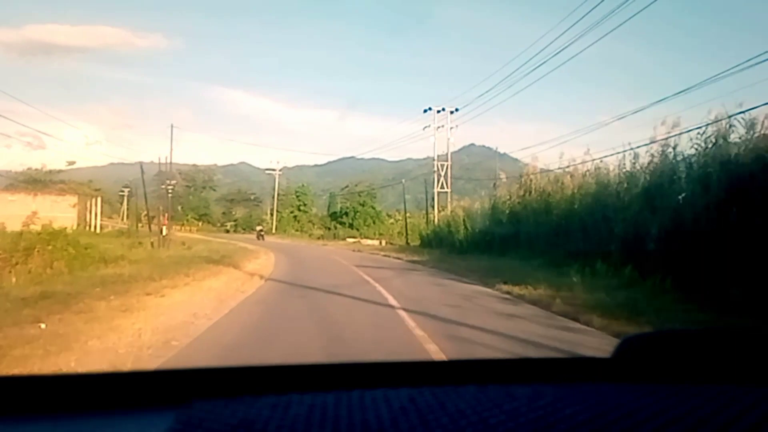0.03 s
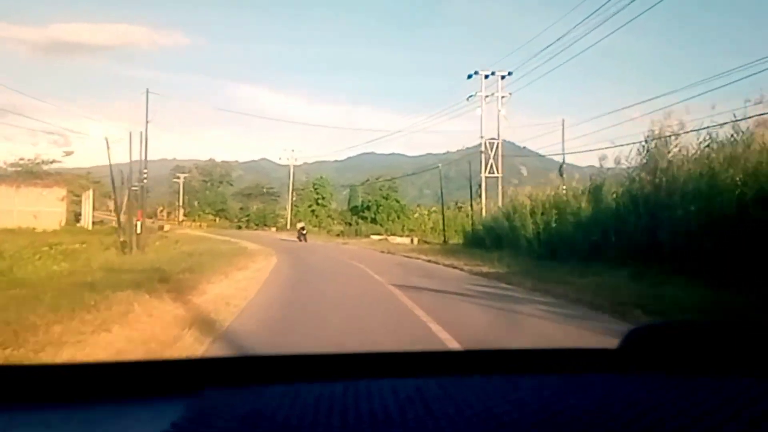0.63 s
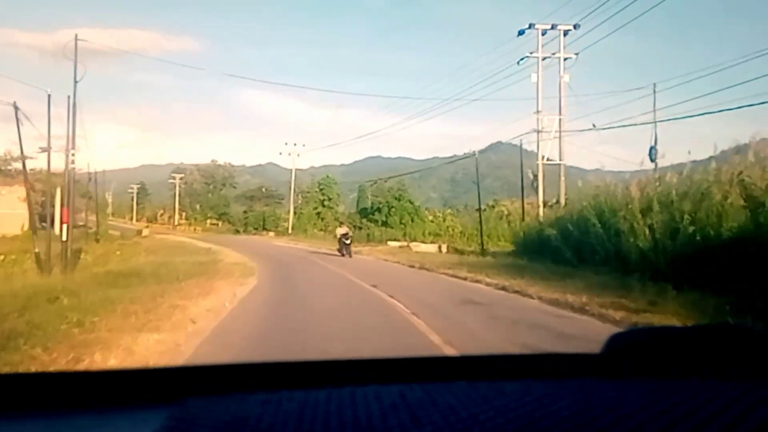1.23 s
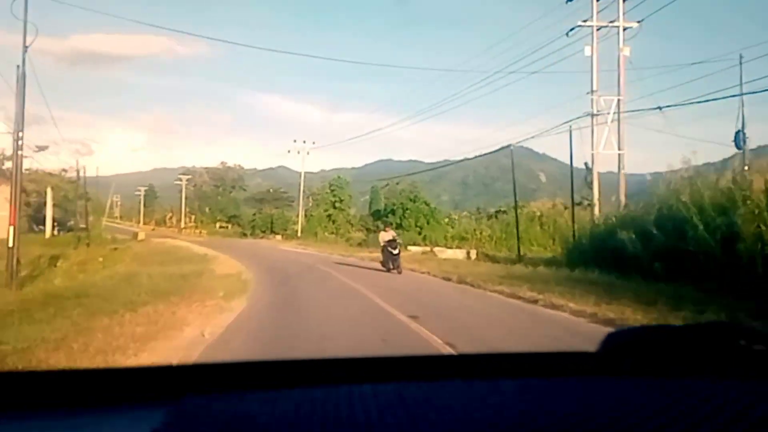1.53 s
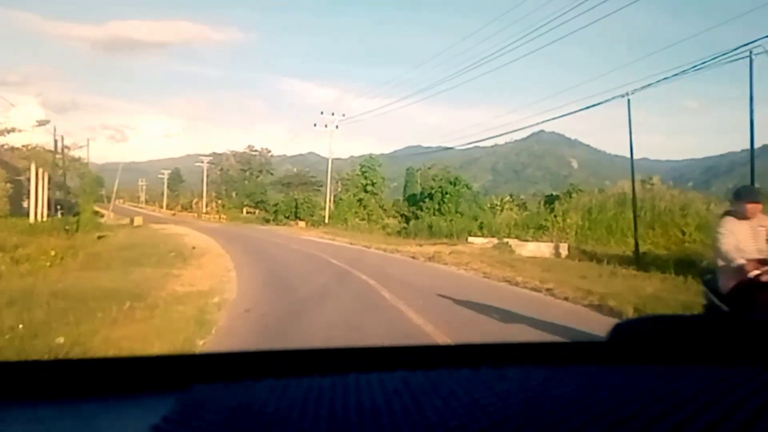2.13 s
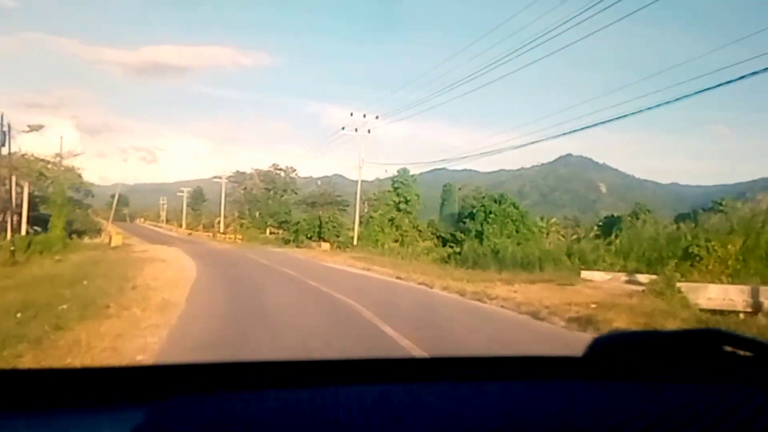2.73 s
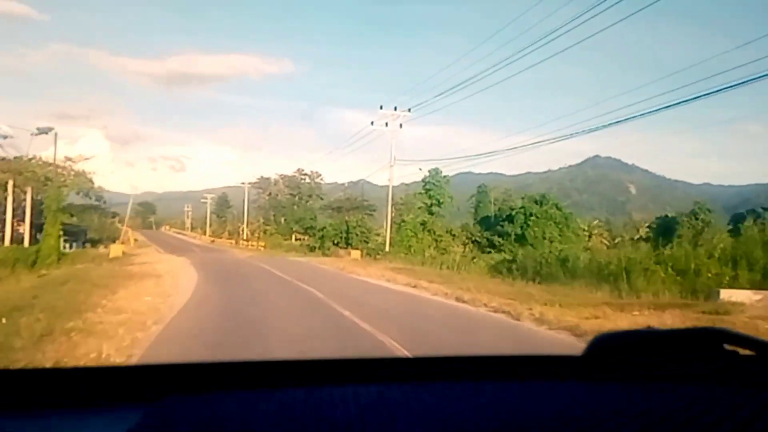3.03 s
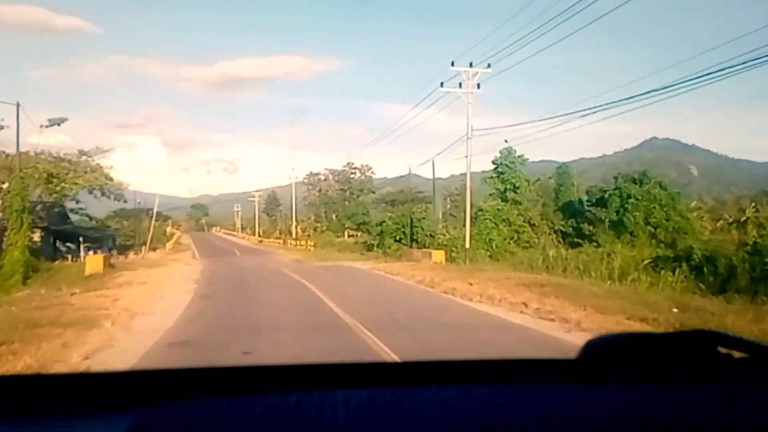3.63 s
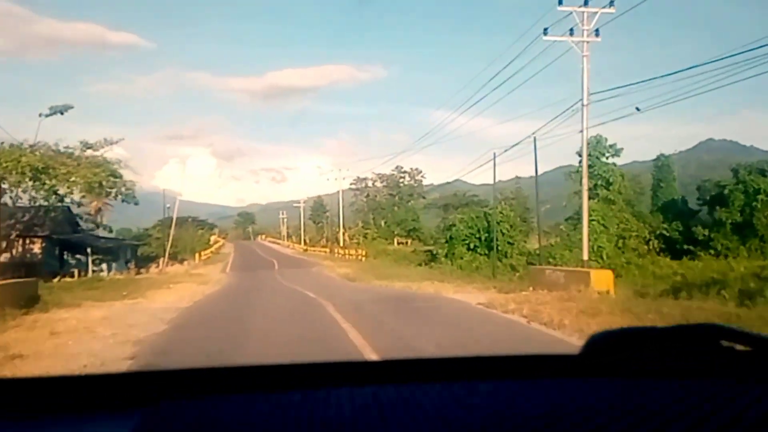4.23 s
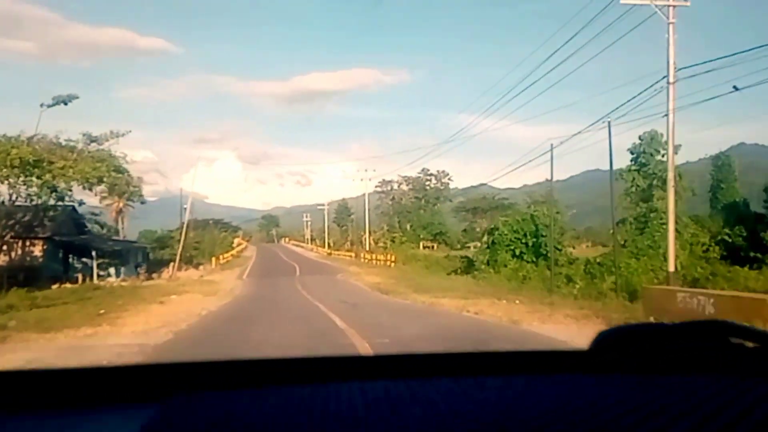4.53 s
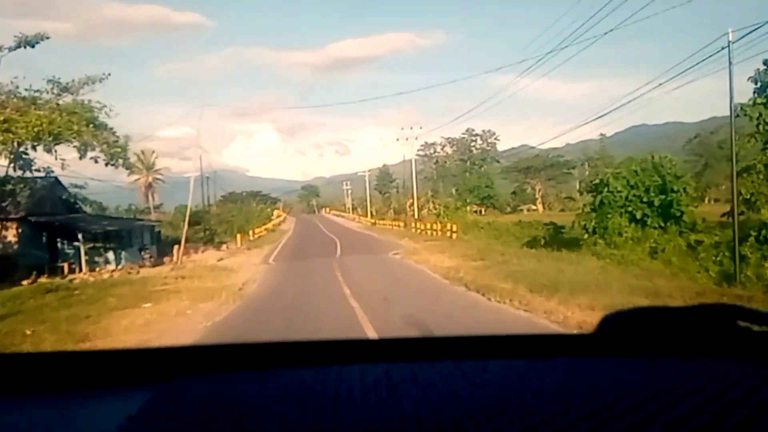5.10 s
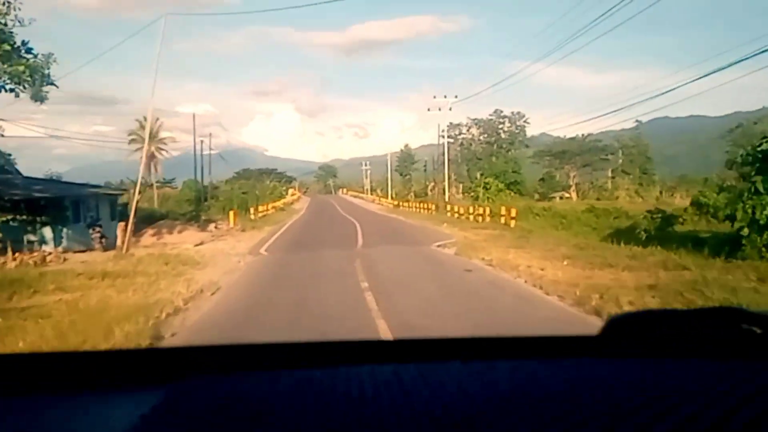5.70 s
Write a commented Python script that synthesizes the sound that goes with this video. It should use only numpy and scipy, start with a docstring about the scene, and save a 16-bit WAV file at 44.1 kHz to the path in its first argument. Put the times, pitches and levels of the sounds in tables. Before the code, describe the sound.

Inside a moving car, a steady engine hum and road rumble, with a motorcycle hissing past and a thumping bump near the end.

```python
"""A four-cylinder engine hums through the cabin of a car on a country road, over road rumble and tyre roar.
An oncoming motorcycle hisses past, loose trim ticks, and air hisses and whistles at seals and a window gap.
The suspension thumps now and then. Near the end the wheels hit a bump: the cabin thumps, a loose part
clacks, and a short hiss follows. Gain control ducks the loudest peaks."""
import sys
import numpy as np
from scipy import signal
from scipy.fft import rfft, irfft, next_fast_len
from scipy.io import wavfile
from scipy.ndimage import uniform_filter1d, minimum_filter1d, map_coordinates

SR = 44100
rng = np.random.default_rng(int(sys.argv[2]) if len(sys.argv) > 2 else 0)


def store_pcm(level_fs):
    """Save levels as 16-bit WAV."""
    pcm = np.round(np.clip(level_fs, -1, 1) * 32767).astype(np.int16)
    wavfile.write(sys.argv[1], SR, np.atleast_2d(pcm).T)


N = 262836

# Engine speed. Each row: time in seconds, firing rate in Hz.
FIRING_RATE = [(0, 85.2), (.9, 83.6), (2, 83.7), (2.55, 84.2), (3.05, 83.6), (4, 81.4), (4.5, 80.1),
               (5.05, 78.6), (5.4, 77.4), (5.96, 78.6)]
# Asphalt coarseness. Each row: time in seconds, tyre roar in dB.
ASPHALT = [(.25, -46), (.55, -40.5), (1.9, -40.5), (2.4, -39.5), (3.5, -40.5), (4.05, -41.5), (4.3, -44.5),
           (4.7, -42.5), (5.96, -41.5)]


def engine():
    """The firing rate excites a cabin boom; harmonics drone under load; uneven cylinders add half orders."""
    # Each row: time in seconds, first harmonic in dB.
    boom_levels = [(0, -18), (.487, -18), (.5, -25.5), (1.05, -27), (1.22, -23), (3.45, -24), (3.87, -20.5),
                   (4.02, -23.5), (4.22, -19), (4.85, -22.5), (5, -30), (5.2, -24), (5.45, -34.5),
                   (5.96, -33)]
    # Exhaust drone. Each row: time in seconds, second and third harmonics in dB.
    drone_levels = [(0, -34.5, -37.5), (1, -47.5, -43), (1.3, -29.5, -34), (1.7, -30.5, -33.5),
                    (2.4, -33, -32), (2.9, -36.5, -44), (3.5, -38.5, -36), (3.85, -38, -50),
                    (4.25, -34.5, -41), (4.9, -27.5, -38), (5.4, -34, -36.5), (5.96, -38, -42)]
    # Each row: multiple of the firing rate, dB relative to the third harmonic.
    weak_orders = [(.5, -8.5), (3.5, -14), (4, -17.5), (4.5, -12), (5, -14)]
    phase = running_phase(curve(FIRING_RATE))
    boom = amp(curve(boom_levels)) * np.sin(phase)
    second_db, third_db = curves(drone_levels)
    orders = [(2, second_db), (3, third_db)]
    orders += [(order, third_db + db + 2.5 * wobble(4)) for order, db in weak_orders]
    drone = np.zeros(N)
    for order, db in orders:
        gain = amp(db + 0.16 * wobble(12))
        drone += gain * np.sin(order * phase + rng.uniform(0, 2 * np.pi) + 0.061 * wobble(23))
    return np.sqrt(2) * (boom + drone)


def road():
    """Uneven asphalt shakes the suspension and body panels, and at times a cabin resonance swells."""
    # Each row: frequency in Hz, relative level in dB.
    rumble_spectrum = [(15, -53), (28, -32.5), (40, -9.5), (54, 5), (68, 6), (85, 0), (106, 3), (145, -4.5),
                       (200, -21.5), (400, -78.5)]
    panel_spectrum = [(90, -34), (150, -1.5), (200, -3), (235, -2), (275, 0), (310, -3), (340, -3.5),
                      (405, -4), (450, -12), (560, -18), (900, -69)]
    cavity_spectrum = [(150, -42), (198, -4), (215, -4), (231, 4.5), (243, -12), (290, -38.5), (400, -71)]
    # Brief rises and dips in the low rumble and panel noise.
    # Each row: centre and half width in seconds, rumble change and panel change in dB.
    rumble_swells_and_dips = [(.53, 0.063, -6, 3), (2.33, 0.21, -3.5, 1), (2.8, 0.17, 3.5, 1.5),
                              (4.95, 0.069, 7.5, -4), (5.41, 0.11, 6, 3), (5.78, 0.032, 0, 5)]
    # Cabin resonance swell. Each row: time in seconds, level in dB.
    cavity_levels = [(0, -54), (1.2, -42), (2.6, -43), (3.1, -44), (3.6, -39), (4.1, -35), (4.2, -54),
                     (4.65, -59), (4.95, -37), (5.96, -43)]
    t = np.arange(N) / SR
    rumble_db = -31.5 + 0.77 * coarseness_db() + 0.86 * wobble(7.2)
    panel_db = -34 + 0.45 * coarseness_db()
    for centre_s, half_width_s, rumble_change_db, panel_change_db in rumble_swells_and_dips:
        window = np.exp(-((t - centre_s) / half_width_s) ** 2)
        rumble_db += rumble_change_db * window
        panel_db += panel_change_db * window
    rumble = amp(rumble_db) * noise(rumble_spectrum)
    panels = amp(panel_db + 0.083 * wobble(7.8)) * noise(panel_spectrum)
    cavity = amp(curve(cavity_levels)) * noise(cavity_spectrum)
    return rumble + panels + cavity


def tyres():
    """The tread roars, rings and, on some surfaces, howls; the glass cuts the treble."""
    # Each row: frequency in Hz, relative level in dB.
    roar_spectrum = [(250, -31.5), (420, -8.5), (520, 1.5), (660, -2), (770, 0), (900, -5.5), (1170, -7.5),
                     (1450, -8.5), (1700, -4), (2080, -10.5), (2350, -21), (3200, -50)]
    howl_spectrum = [(600, -35), (850, -12), (940, -2), (1050, 4.5), (1150, -10.5), (1500, -42.5)]
    # Tread and cabin resonances. Each row: centre and width in Hz, gain in dB.
    tread_modes = [(1284, 120, 1.5), (1640, 190, -4), (1884, 70, 3.5), (2109, 31, -1)]
    # Each row: time in seconds, level in dB.
    howl_levels = [(.25, -56.5), (.6, -51), (2.5, -50), (3.1, -48.5), (3.6, -48), (4.05, -48.5),
                   (4.3, -53.5), (4.7, -52), (5.2, -52), (5.96, -49.5)]
    drive = noise([(500, -26.5), (950, 4.5), (2100, -7), (2600, -30)])
    ring = unit(filtered(drive, lambda hz: ringing(hz, tread_modes)))
    roar = amp(0.6) * noise(roar_spectrum) + amp(-6) * ring
    howl = amp(curve(howl_levels)) * noise(howl_spectrum)
    return amp(curve(ASPHALT) + 0.51 * wobble(22)) * patchy(roar, depth_db=1.38) + howl


def bumps():
    """Blows through the suspension thump the body and knock its panels."""
    # Each row: start in seconds, thump in dB, pitch in Hz, time to crest in seconds, knock in dB.
    blows = [(0.215, -10, 125, 0.004, -16), (1.483, -19.5, 108, 0.013, -27),
             (1.520, -14.5, 99, 0.0051, -22), (3.191, -20.5, 71, 0.013, -29), (3.743, -24, 119, 0.013, -33),
             (4.934, -26, 55.5, .012, -16.5), (5.087, -14.5, 89, 0.0086, -23.5),
             (5.1346, -3.5, 123, 0.0053, -6.5), (5.1498, -12, 114, 0.0059, -29),
             (5.2111, -2.5, 103, 0.0076, -13.5), (5.283, -12.5, 69, 0.013, -21)]
    # Each row: frequency in Hz, level in dB, T60 in seconds.
    panel_modes = [(176, 1, 0.02), (195.4, -3.5, 0.13), (271, -1, 0.054), (504, -19.5, 0.031)]
    out, t = np.zeros(N), np.arange(SR // 4) / SR
    knock_rise_s, steepness = 0.0018, 2.7
    knock = sum(amp(db) * np.sin(2 * np.pi * hz * t) * fade(t, t60_s) for hz, db, t60_s in panel_modes)
    knock *= 1 - np.exp(-t / knock_rise_s)
    for start_s, thump_db, hz, crest_s, knock_db in blows:
        swell = (t / crest_s * np.exp(1 - t / crest_s)) ** steepness
        thump = swell * np.sin(2 * np.pi * hz * t)
        add(out, start_s, amp(thump_db) * thump + amp(knock_db) * knock)
    return out


def clacks():
    """At the bump a loose part snaps and chatters: loud, dull clacks among fainter, brighter clicks."""
    # Each row: start in seconds, level in dB, band centre and width in Hz, T60 in seconds.
    contacts = [(5.0903, -27, 3330, 450, 0.0095), (5.094, -34.5, 3500, 1200, 0.046),
                (5.109, -40.5, 3870, 3000, 0.086), (5.1346, -15.5, 750, 1600, 0.0082),
                (5.1454, -18.5, 1700, 2400, 0.024), (5.208, -21.5, 1100, 1100, 0.019),
                (5.2108, -27, 5770, 2400, 0.01)]
    # Each row: centre and width in Hz, gain in dB.
    part_modes = [(507, 164, 23.5), (970, 760, 13.5), (1730, 260, 13.5), (2310, 310, 2), (3880, 660, 3),
                  (4740, 500, 0), (6030, 540, 1.5), (7400, 400, -22)]
    out, t = np.zeros(N), np.arange(SR // 4) / SR
    snap = unit(1. * (t == 0))
    for start_s, db, centre_hz, width_hz, t60_s in contacts:
        decay = fade(t, t60_s)
        contact = snap + unit(rng.standard_normal(len(t)) * decay)
        clack = filtered(contact, lambda hz: ringing(hz, part_modes) * resonance(hz, centre_hz, width_hz))
        add(out, start_s, amp(db) * unit(clack) * np.sqrt(np.mean(decay ** 2)))
    return out


def passes():
    """A hiss swells and falls in pitch as the motorcycle goes by; a softer one follows the bump."""
    # Each row: closest moment and width in seconds, then hiss, roar and falling band in dB.
    pass_events = [(2.302, .09, -40.5, -36, -47.3), (5.381, 0.092, -49, -47, -59)]
    # Each row: frequency in Hz, relative level in dB.
    hiss_spectrum = [(1500, -10), (2450, -6.5), (3000, 0.5), (3800, 2.5), (4400, -4), (5000, -4.5),
                     (5700, -5.5), (6400, 4.5), (6850, -7), (7600, -19), (8200, -38)]
    roar_spectrum = [(100, -7), (500, 10), (800, 3.5), (1200, 2.5), (1600, 7), (2100, 5), (2500, -9),
                     (4000, -23.5)]
    # Falling band. Each row: offset from its centre in Hz, relative level in dB.
    band_skirt = [(1, 0), (300, -1), (550, -8), (1200, -28)]
    mid_hz, swing_hz, lag_widths, sweep_widths = 4000, 1200, 0.45, 0.8
    out, t = np.zeros(N), np.arange(N) / SR
    for closest_s, width_s, hiss_db, roar_db, band_db in pass_events:
        place = (t - closest_s) / width_s  # negative ahead, positive behind
        nearness = (1 + (place / 2) ** 2) ** -2.37
        hiss = amp(hiss_db) * nearness * patchy(noise(hiss_spectrum), depth_db=1.5)
        roar = amp(roar_db) * nearness ** 3 * noise(roar_spectrum)
        band_hz = mid_hz - swing_hz * np.tanh((place - lag_widths) / sweep_widths)
        band = np.sqrt(2) * noise(band_skirt) * np.sin(running_phase(band_hz))
        band *= amp(band_db) * np.exp(-((place - lag_widths / 2) / 2) ** 4)
        out += (hiss + roar + band) * amp(0.5 * wobble(45))
    return out


def trim():
    """Loose plastic ticks faintly in the dashboard, singly or in a quick rattle."""
    # Each row: start in seconds, level in dB, T60 in seconds.
    ticks = [(1.429, -47.5, .025), (1.448, -46, .025), (1.4675, -47, .014), (1.488, -50, .02),
             (1.516, -47.5, .014), (1.545, -49.5, .018), (2.826, -46.5, 0.1), (3.367, -47, .04),
             (3.553, -52, .04), (3.581, -49, 0.075), (3.848, -49, 0.024), (3.995, -49, .03),
             (4.859, -46.5, .035), (4.907, -51, 0.033), (4.957, -44.5, 0.056), (5.014, -47.5, 0.055),
             (5.078, -51, .02), (5.632, -47.5, .025), (5.83, -44, 0.02)]
    out, t = np.zeros(N), np.arange(SR // 10) / SR
    plastic = noise([(1500, -34), (3000, -0.5), (3700, -0.5), (5200, -3), (6500, -0.5),
                     (7300, -15.5), (8200, -24)])
    for start_s, db, t60_s in ticks:
        burst = np.roll(plastic, -round(start_s * SR))[:len(t)]
        add(out, start_s, amp(db) * fade(t, t60_s) * burst)
    return out


def air():
    """Air hisses and sings at the seals, louder on coarse asphalt and at speed, beside two more hisses."""
    # Each row: frequency in Hz, relative level in dB.
    seal_spectrum = [(1200, -19), (2300, -4.5), (2650, 0), (2790, -8), (3050, 2.5), (3300, -1.5),
                     (3650, -1), (4050, -5.5), (4500, -12), (5500, -21.5), (7000, -26.5), (8000, -56)]
    fine_spectrum = [(4000, -24), (5450, -13), (5900, -5.5), (6250, -1), (6680, -9), (7100, -17),
                     (7600, -32.5), (8200, -54.5)]
    upper_mid_spectrum = [(3300, -27.5), (4200, 2), (4900, -0.5), (5500, -7.5), (6300, -22.5)]
    # Each row: centre and width in Hz, gain in dB.
    seal_modes = [(2680, 63, -10.5), (3030, 65, -6.5), (3360, 70, -12), (3560, 150, -7), (4020, 79, -11.5)]
    # Each row: time in seconds, fine hiss and upper-mid hiss in dB.
    treble_levels = [(.3, -64, -67), (.65, -56.5, -63.5), (1.1, -63.5, -67), (2.8, -60, -63.5),
                     (3.05, -61.5, -72), (3.5, -60.5, -72.5), (3.9, -64, -73), (4.7, -64.5, -73.5),
                     (5.05, -61, -61), (5.96, -64.5, -71)]
    cruise_hz, db_per_hz = 83, 0.33
    seal_db = -57 + 0.35 * coarseness_db() + db_per_hz * (curve(FIRING_RATE) - cruise_hz)
    fine_db, upper_mid_db = curves(treble_levels)
    flow = noise([(1800, -39.5), (2500, -3.5), (5500, 8.5), (6500, -28.5)])
    singing = unit(filtered(flow, lambda hz: ringing(hz, seal_modes)))
    seals = amp(seal_db) * patchy(noise(seal_spectrum) + amp(-4.5) * singing, depth_db=2.5)
    fine = amp(fine_db) * patchy(noise(fine_spectrum), depth_db=2.5)
    upper_mid = amp(upper_mid_db) * patchy(noise(upper_mid_spectrum), depth_db=4.5)
    return amp(0.98 * wobble(35)) * (seals + fine + upper_mid)


def whistles():
    """A window gap whistles: each thin, fluttering note swells, sags in pitch and fades."""
    # Each row: start and length in seconds, starting pitch in Hz, fraction of pitch lost, level in dB.
    notes = [(0.04, 0.33, 6310, 0.017, -61), (0.3, 0.4, 4400, 0.05, -63.5), (0.546, 0.85, 6290, 0.023, -63),
             (2.693, 1.0, 6130, 0.023, -65)]
    out = np.zeros(N)
    for start_s, length_s, hz, sag, db in notes:
        progress = np.arange(round(length_s * SR)) / (length_s * SR)
        swell = np.sqrt(np.abs(np.sin(np.pi * progress)))
        flutter = noise([(1, 0), (30, 0), (120, -18), (800, -48)])[:len(progress)]
        tone = np.sqrt(2) * np.sin(running_phase(hz * (1 - sag * progress)))
        add(out, start_s, amp(db) * swell * flutter * tone)
    return out


def coarseness_db():
    """How far the asphalt lifts the tyre roar over its cruising level."""
    cruise_db = -40
    return curve(ASPHALT) - cruise_db


def patchy(x, depth_db):
    """Turbulence: each narrow band swells and sinks on its own. Output rms is 1."""
    bands = signal.stft(x, nperseg=1024)[2]
    field = uniform_filter1d(rng.standard_normal(bands.shape), size=4, axis=0)
    field = unit(uniform_filter1d(field, size=6, axis=1))
    return unit(signal.istft(bands * amp(depth_db * field), nperseg=1024)[1][:N])


def amp(db):
    """Decibels to gain."""
    return 10 ** (np.asarray(db) / 20)


def unit(x):
    """Scale to rms 1."""
    return x / np.sqrt(np.mean(x ** 2) + 1e-20)


def curves(rows):
    """One value per sample for each column after the time."""
    times_s, *columns = np.transpose(rows)
    return [np.interp(np.arange(N) / SR, times_s, column) for column in columns]


def curve(rows):
    """One value per sample from (seconds, value) rows."""
    return curves(rows)[0]


def running_phase(hz):
    """Phase in radians of a changing frequency."""
    return 2 * np.pi * np.cumsum(hz) / SR


def wobble(knots_per_s):
    """A smooth random curve."""
    knots = rng.standard_normal(int(N * knots_per_s / SR) + 4)
    return map_coordinates(knots, [np.arange(N) * knots_per_s / SR])


def filtered(x, response):
    """Apply a response given as a function of Hz."""
    size = next_fast_len(len(x) + 8192)
    return irfft(rfft(x, size) * response(np.fft.rfftfreq(size, 1 / SR)), size)[:len(x)]


def noise(spectrum):
    """Noise of rms 1 with a (Hz, dB) spectrum read on a log axis."""
    knots_hz, db = np.transpose(spectrum)
    white = rng.standard_normal(N)
    return unit(filtered(white, lambda hz: amp(np.interp(np.log(hz + 1), np.log(knots_hz), db))))


def resonance(hz, centre_hz, width_hz):
    """Causal response of one damped mode."""
    return 1j * hz * width_hz / (centre_hz ** 2 - hz ** 2 + 1j * hz * width_hz)


def ringing(hz, modes):
    """Response of several modes, summed with alternating signs."""
    return sum((-1) ** k * amp(db) * resonance(hz, centre_hz, width_hz)
               for k, (centre_hz, width_hz, db) in enumerate(modes))


def fade(t, t60_s):
    """Decay by 60 dB in t60_s."""
    return np.exp(-np.log(1000) * t / t60_s)


def add(track, start_s, sound):
    """Mix a sound into the track."""
    part = track[round(start_s * SR):][:len(sound)]
    part += sound[:len(part)]


def scene():
    """Mono mix inside the cabin."""
    return (engine() + road() + tyres() + air() + whistles() + passes() + trim() + bumps() + clacks())[None]


def record(dry):
    """Gain control ducks loud peaks, holds and recovers; a steep low-pass follows."""
    ceiling_db, hold_s, recovery_db_per_s, cutoff_hz = -10, 0.027, 175, 7750
    x = dry[0]
    needed_db = np.minimum(0, ceiling_db - 20 * np.log10(np.abs(x) + 1e-9))
    hold_samples = round(hold_s * SR)
    held_db = minimum_filter1d(needed_db, hold_samples, origin=(hold_samples - 1) // 2)
    recovery_db = recovery_db_per_s * np.arange(N) / SR
    gain_db = np.minimum.accumulate(held_db - recovery_db) + recovery_db
    ducked = x * amp(uniform_filter1d(gain_db, SR // 500))  # gain smoothed over 2 ms
    return filtered(ducked, lambda hz: 1 / np.sqrt(1 + (hz / cutoff_hz) ** 80))[None]


dry = scene()
out = record(dry)
store_pcm(out)
```